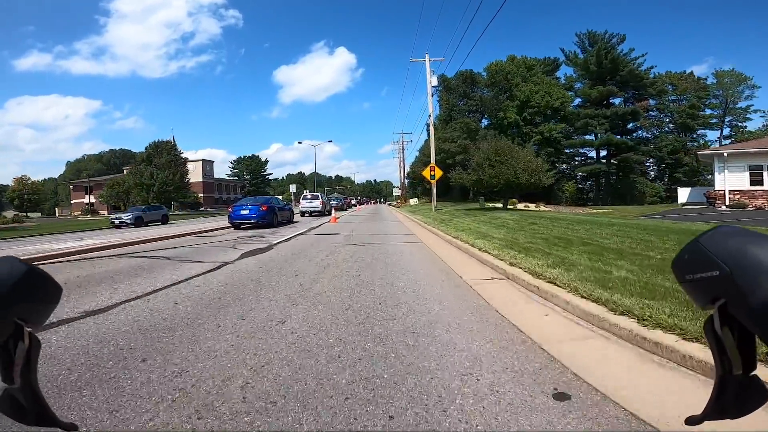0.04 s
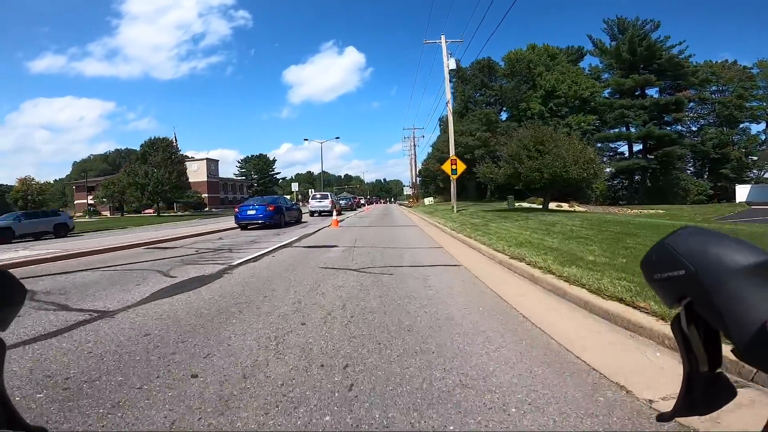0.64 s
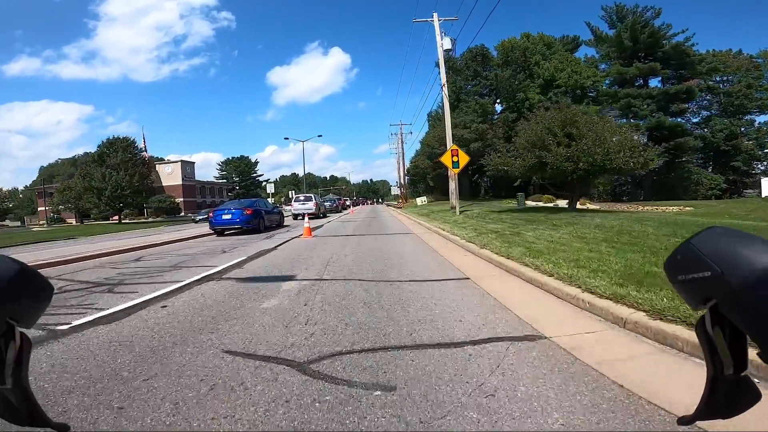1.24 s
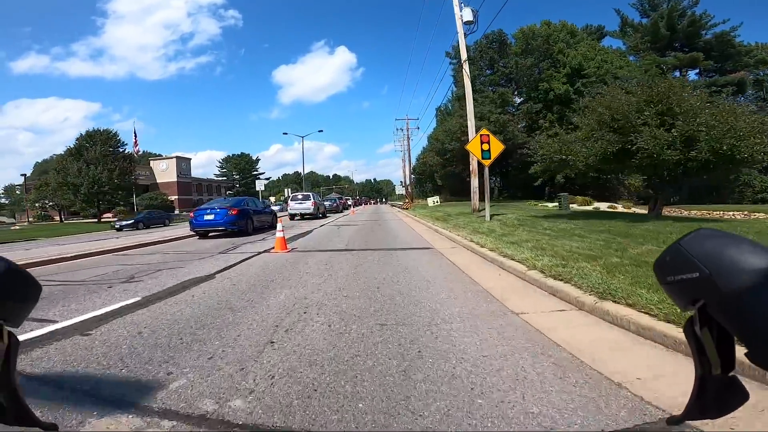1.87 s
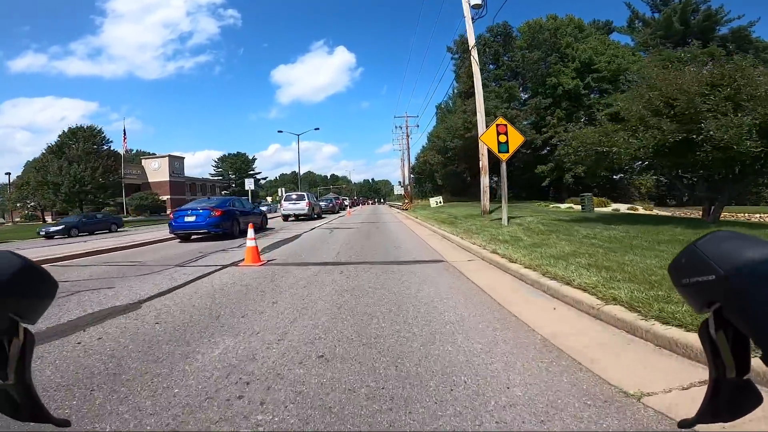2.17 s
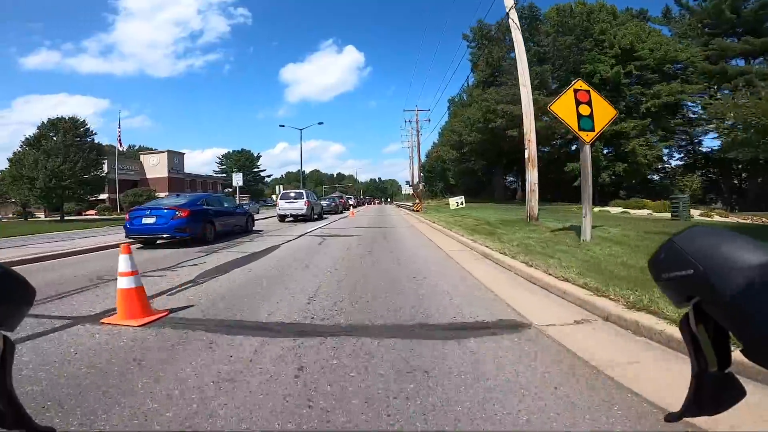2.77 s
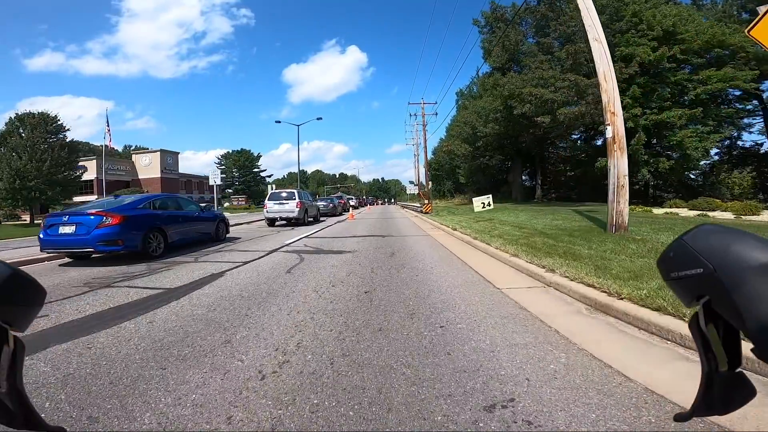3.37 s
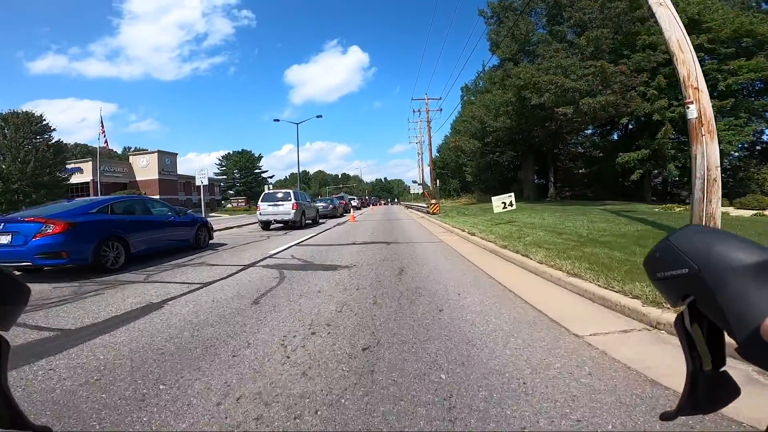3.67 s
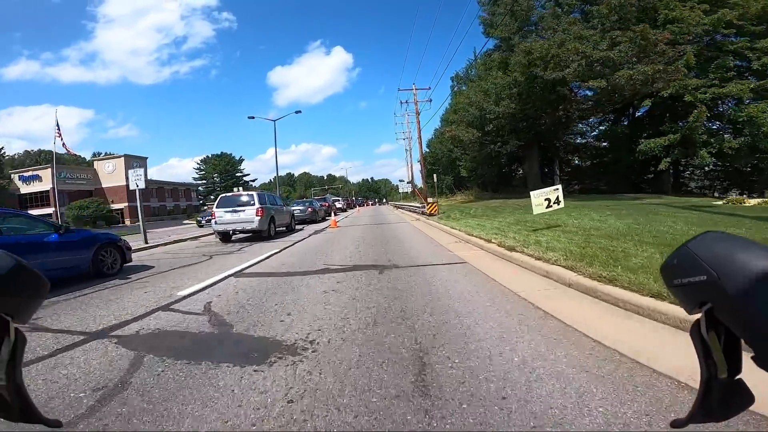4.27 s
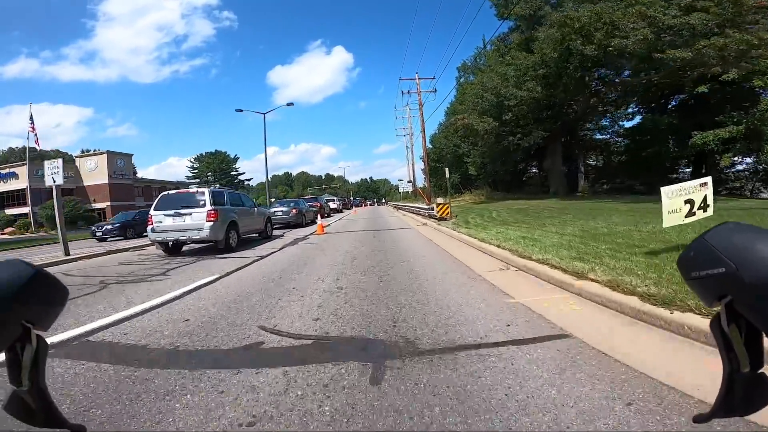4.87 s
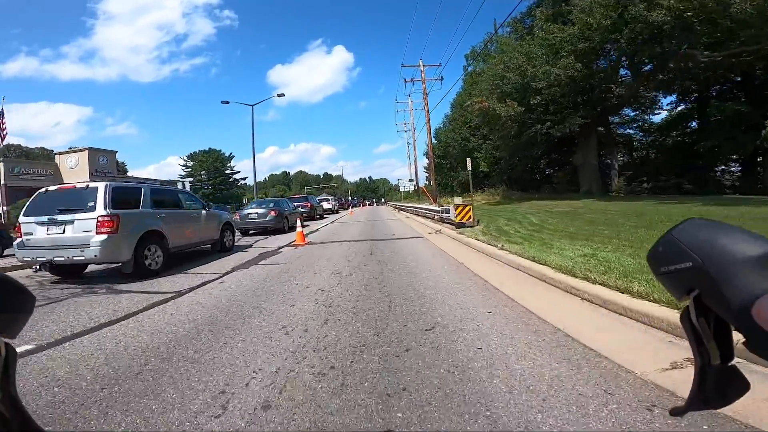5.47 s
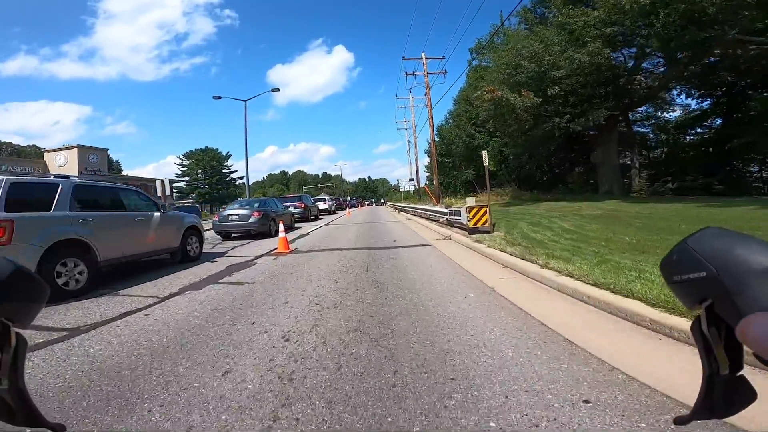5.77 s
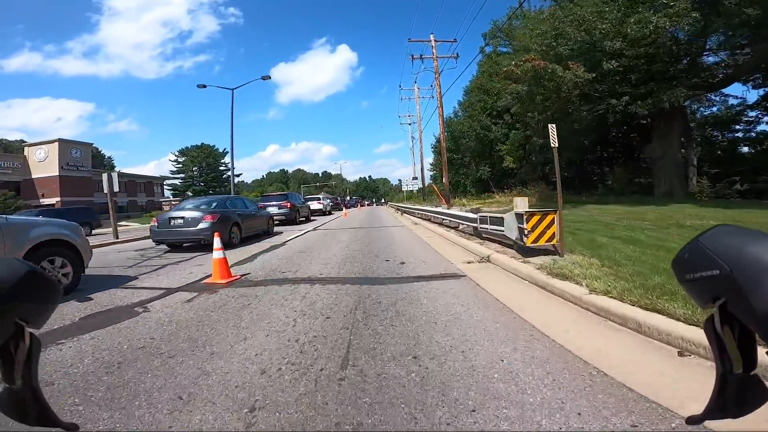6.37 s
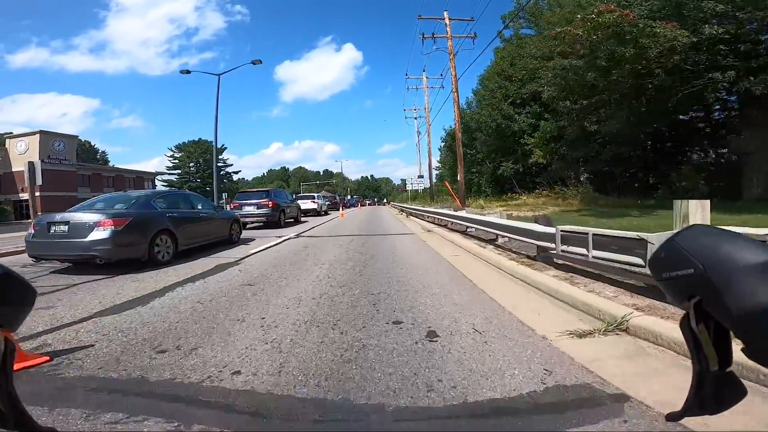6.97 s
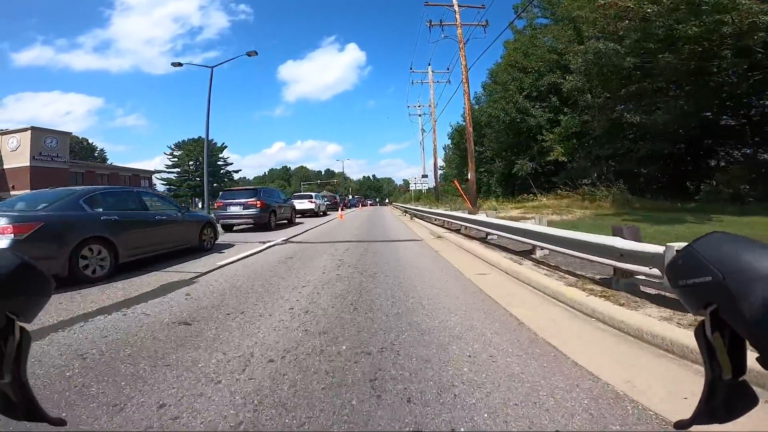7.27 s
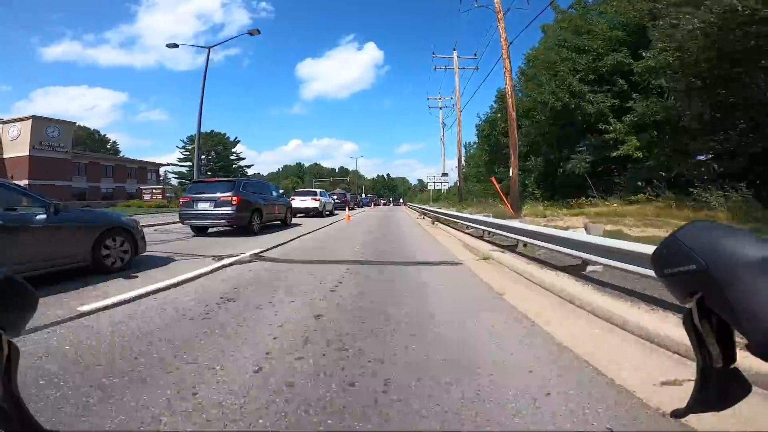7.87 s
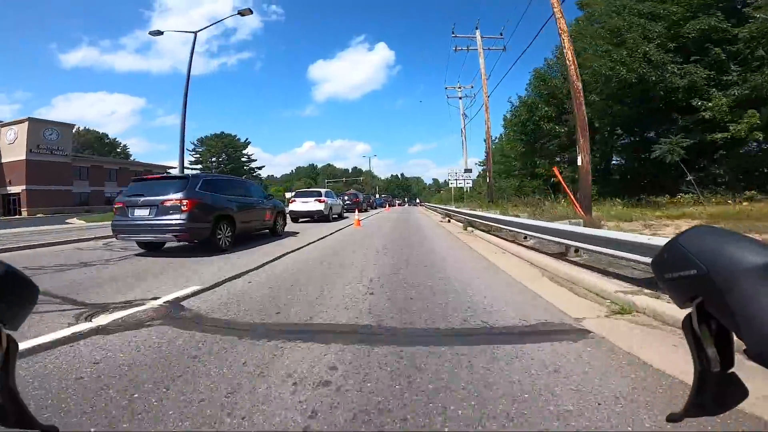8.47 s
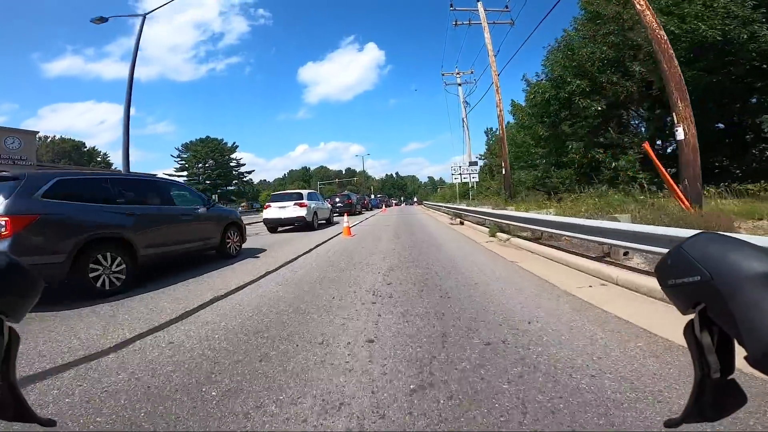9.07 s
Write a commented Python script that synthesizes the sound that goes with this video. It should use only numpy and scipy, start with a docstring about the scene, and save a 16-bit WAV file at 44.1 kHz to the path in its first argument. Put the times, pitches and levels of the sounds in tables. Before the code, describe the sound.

Heard from the handlebar of a moving bicycle, gusty wind rumbles on the microphone while coarse asphalt makes the frame hum and the tyres hiss. Car tyres swell and fade along the street. Grit ticks, a loose part rattles briefly and bumps thud through the mount. One car passes close in the second half, a clack follows, and the wind eases near the end, with very faint insects at the roadside.

```python
"""Coarse asphalt road beside a queue of cars, summer day, heard from the handlebar of a rolling bicycle.
Air buffets the microphone; road grain shakes fork and frame, bumps knock the mount, the treads hiss,
the chain whirrs, grit ticks. Car tyres roar and fade on the far lanes and one car passes close.
Insects shrill more and more from the verge."""
import sys
import numpy as np
from scipy import signal
from scipy.fft import rfft, irfft, next_fast_len
from scipy.io import wavfile
from scipy.ndimage import uniform_filter1d, minimum_filter1d

SR = 44100
rng = np.random.default_rng(int(sys.argv[2]) if len(sys.argv) > 2 else 0)


def to_wav(sig):
    """Store sig (one row per channel, or 1-D mono) as 16-bit WAV at the path in sys.argv[1].

    Samples outside -1..1 are clipped; the rate is SR.
    """
    pcm = np.clip(np.atleast_2d(sig), -1, 1) * 32767
    pcm = np.round(pcm).astype(np.int16)
    wavfile.write(sys.argv[1], SR, pcm.T)  # frames by channels


N = 407043
T = np.arange(N) / SR
LULL_AT_S, LULL_FADE_S = 7.98, 0.74  # head wind slackens
# passing cars: t/s, half length/s, tread note f/Hz, width/Hz, level/dB, rise/dB of roar, rasp, hiss
CARS = [(.5, 0.71, 1004, 115, -43, -0.2, 1, 1.2), (1.92, 0.78, 1736, 282, -57, 1.5, 3.5, 3),
        (3.152, 0.15, 1317, 150, -46, 0.5, 0, 0.5), (3.55, 0.36, 930, 182, -42, -0.7, 1, 1),
        (5.4, 0.26, 1070, 450, -48.5, 1.6, 2.4, 0.8), (6.4, 0.39, 900, 220, -47, 2, 2.5, 3),
        (8.348, 0.21, 802, 109.6, -47, -0.1, 1, 0.9)]


def wind(level_db=-25.5, lull_db=-5, buffet_db=0.63, gust_half_s=0.2):
    """Eddies shed by the housing: even in strength, apart from gusts and a lull."""
    # eddy spectrum: f/Hz, level/dB
    spectrum = [(8, -6.5), (22, -2), (42, -1), (68, -2), (90, -4.5), (130, -9.5), (170, -18.5), (260, -27),
                (500, -38.5), (1200, -59.5)]
    # gusts and slacks: t/s, change/dB
    gusts = [(.72, 2.5), (1.38, -1), (2.02, 4), (2.53, 1.5), (3.4, 2.5), (4.3, 4), (5.25, 4.5), (5.75, 1),
             (7.1, 2.5)]
    gust_db = sum(db * swell(s, gust_half_s) for s, db in gusts)
    db = level_db + gust_db + lull_db * step(LULL_AT_S, LULL_FADE_S) + buffet_db * walk(9)
    return even(colour(noise(), spectrum), span_s=0.14, steadiness=1.0) * undb(db)


def fork(hz=55.1, width_hz=11.5, road_db=-31, lull_db=-10, t60_s=1.2, rise_s=0.078):
    """Road and wind drive the lowest mode of fork and handlebar; each seam adds a jolt."""
    # tar seams: t/s, level/dB
    seams = [(3.0, -21), (3.9, -22), (4.72, -16.5), (5.33, -23), (6.3, -24), (6.62, -19), (7.3, -24.5),
             (8.93, -23)]
    steady = undb(road_db + lull_db * step(LULL_AT_S, LULL_FADE_S))
    jolt_power = sum((undb(db) * decay(s, t60_s)) ** 2 for s, db in seams)
    swing = uniform_filter1d(np.sqrt(steady ** 2 + jolt_power), int(rise_s * SR) + 1)
    return even(narrow(hz, width_hz), span_s=0.1, steadiness=0.65) * swing


def frame(shake_db=-39.5, casing_db=-44, wheel_db=0.9, patchy_db=1.0, wheel_hz=2.85):
    """Asphalt stones drum on the tyre casing and, through it, shake the frame."""
    # frame and handlebar modes: f/Hz, width/Hz, level/dB
    frame_modes = [(96.7, 33, -2.5), (115.5, 29, 2), (139.1, 9.1, 1), (163.2, 14, -7), (204.6, 21.2, -2.5)]
    # casing and rim modes: f/Hz, width/Hz, level/dB
    casing_modes = [(344.3, 11.3, -3), (427, 34, -4.5), (520, 38, -0.2), (829, 69, -2)]
    # coarser or smoother stretches: t/s, half length/s, shaking change/dB, drumming change/dB
    asphalt = [(.7, 0.48, 6, 1.5), (1.4, .2, 1, -2), (2.3, 0.32, 1, 0.5), (3.5, 0.13, 3.5, 3),
               (4.1, 0.35, -8.5, -1), (4.85, 0.28, 0.5, 0.5), (5.75, 0.16, 4, -5), (6.235, .09, 0, 5.5),
               (6.5, 0.78, 1.5, -1.5), (7.523, 0.11, -1.5, -8), (8.4, 0.44, 2.5, 2),
               (8.954, 0.22, -1.5, -4)]
    force = grains(per_s=2500, spread_db=2.0)
    rough_db, drum_db = sum(np.outer(changes, near(s, half_s)) for s, half_s, *changes in asphalt)
    shaking = ring(force * undb(shake_db + rough_db), frame_modes)
    wheel = np.cos(2 * np.pi * wheel_hz * (T - 4.67))  # uneven tyre presses harder once a turn
    drive_db = casing_db + drum_db + wheel_db * wheel + patchy_db * walk(6)
    drumming = ring(force * undb(drive_db), casing_modes)
    return lowpass(shaking, hz=260, order=4) + lowpass(drumming, hz=1100, order=4)


def bumps(thud_hz=121, thud_t60_s=0.3, rise_t60_s=0.04):
    """A bump swings the handlebar and makes the plastic mount clack."""
    # road bumps: t/s, thud/dB, clack/dB
    hits = [(4.19, -28, -48), (6.536, -19, -45), (7.7549, -20.5, -30)]
    # mount modes: f/Hz, level/dB, t60/s
    mount_modes = [(900, -6, .012), (1440, 3, 0.018), (1750, -13, 0.011), (2550, -16, .008)]
    out = 0
    for s, thud_db, clack_db in hits:
        envelope = 2 * (decay(s, thud_t60_s) - decay(s, rise_t60_s))
        swing = envelope * np.sin(2 * np.pi * thud_hz * (T - s))
        out = out + undb(thud_db) * swing + undb(clack_db) * struck(s, mount_modes)
    return lowpass(out, hz=3200)  # rubber clamp softens the blow


def tread(level_db=-59.5, drift_db_per_s=0.3248, crackle_db=-7, flicker_db=0.64, dip_db=-2.0):
    """Air squeezed from under the treads hisses; fine sand crackles in it."""
    # hiss spectrum: f/Hz, level/dB
    spectrum = [(1200, -11), (2600, 4.5), (3500, 3), (4400, 0.5), (4850, -1.5), (5300, -4), (5900, -7),
                (7800, -11), (9000, -11.5), (9700, -18), (10400, -20.5), (11000, -26), (13000, -41)]
    contact = noise() + undb(crackle_db) * grains(per_s=1100, spread_db=3.5)
    _, _, cars_db = car_rises_db()
    db = level_db + drift_db_per_s * T + cars_db + dip_db * dip() + flicker_db * walk(22)
    return colour(contact, spectrum) * undb(db)


def chain(hz=4850, width_hz=190, push_half_s=0.094):
    """The taut chain whirrs on the sprockets at each push."""
    # pedal strokes: t/s, level/dB
    pushes = [(.12, -70), (.55, -72), (1.13, -67), (1.58, -63), (2.05, -69), (2.43, -69), (2.8, -69),
              (3.45, -68), (3.87, -67), (4.25, -69), (4.65, -70), (5.45, -72), (5.95, -69.5), (6.28, -69),
              (6.62, -68), (6.95, -71), (7.35, -69), (7.65, -72), (8.2, -73)]
    return narrow(hz, width_hz) * sum(undb(db) * swell(s, push_half_s) for s, db in pushes)


def grit(t60_s=0.011, ring_db=-7):
    """Flicked stones tick on the frame and leave the metal ringing."""
    # stone hits: t/s, level/dB
    stones = [(2.298, -49.5), (2.3063, -45), (2.328, -53), (2.7673, -52.5), (3.2331, -34.5), (3.2358, -41),
              (3.2424, -49), (3.253, -51.5), (6.1446, -55), (8.6469, -57)]
    # snap of stone on metal: f/Hz, level/dB
    spectrum = [(1800, -1), (3200, 2.5), (5000, 3.5), (6500, 3.2), (7800, 2.5), (9000, 0), (10000, -14),
                (12500, -26)]
    # metal modes: f/Hz, level/dB, t60/s
    metal_modes = [(3360, 7, .05), (5200, -3, .04), (6240, -2, .06), (7050, 4, .05), (8860, -5, .06)]
    blows = sum(undb(db) * decay(s, t60_s) for s, db in stones)
    ticks = even(colour(noise(), spectrum), span_s=0.001, steadiness=.8) * blows
    ringing = signal.fftconvolve(ticks, struck(0, metal_modes))[:N]
    return ticks + undb(ring_db) * np.std(ticks) * unit(ringing)


def rattle(t60_s=0.016):
    """A loose part chatters against the handlebar, dull and dry."""
    # knocks: t/s, level/dB
    knocks = [(5.4305, -43), (5.4452, -36), (5.448, -44), (5.457, -46)]
    # knock spectrum: f/Hz, level/dB
    spectrum = [(800, 2), (1500, 0), (2500, -7), (4500, -11), (5600, -20), (9000, -34)]
    envelope = sum(undb(db) * decay(s, t60_s) for s, db in knocks)
    chatter = even(colour(noise(), spectrum), span_s=0.00091, steadiness=.5)
    return lowpass(chatter * envelope, hz=5000, order=6)


def scuff():
    """The tyre scuffs over loose sand."""
    # sand patches: t/s, half length/s, level/dB
    patches = [(1.58, .08, -55), (5.33, .06, -56), (5.44, 0.047, -54), (6.22, .04, -56), (6.64, 0.079, -53)]
    sand = colour(noise(), [(1600, 9.5), (2800, 11), (4500, -5), (6000, -12), (9000, -25)])
    return sand * sum(undb(db) * swell(s, half_s) for s, half_s, db in patches)


def traffic(roar_db=-35.5, roar_db_per_s=-.5, rasp_db=-48, rasp_db_per_s=-0.3667,
            waver_db=.5, roar_dip_db=-2.0, rasp_dip_db=-1.5):
    """Far car tyres: a slowly receding roar and a brighter rasp, both shifting as cars pass."""
    # roar spectrum: f/Hz, level/dB
    roar_spectrum = [(150, -4.5), (280, -1.5), (450, 0), (640, -2), (800, 2.15), (1020, 0.3), (1180, -2),
                     (1380, -6), (1600, -17), (2400, -35)]
    # rasp spectrum: f/Hz, level/dB
    rasp_spectrum = [(700, -14.5), (1300, 2), (1600, 4.5), (2000, -0.5), (2600, -7), (3400, -14),
                     (5000, -24.5), (9000, -52.5)]
    roar_rise_db, rasp_rise_db, _ = car_rises_db()
    roar = undb(roar_db + roar_db_per_s * T + roar_rise_db + roar_dip_db * dip() + waver_db * walk(11))
    rasp = undb(rasp_db + rasp_db_per_s * T + rasp_rise_db + rasp_dip_db * dip())
    return colour(noise(), roar_spectrum) * roar + colour(noise(), rasp_spectrum) * rasp


def passing_cars():
    """Each car's tread note swells and fades with distance."""
    return sum(narrow(hz, width_hz) * undb(db) * near(s, half_s)
               for s, half_s, hz, width_hz, db, *_ in CARS)


def close_car(at_s=7.03, approach_s=.5, leave_s=.36, comb_hz=600, bounce=0.8, db=-41, tooth_db=-44.5):
    """Direct and road-reflected noise form a comb that sinks as the car nears, then rises."""
    # car spectrum: f/Hz, level/dB
    spectrum = [(380, -12.0), (500, 0.5), (590, 1.5), (850, -3), (1050, -4.5), (1300, -11),
                (2200, -26.5)]
    distance = np.hypot(1, (T - at_s) / np.where(T < at_s, approach_s, leave_s))  # 1 when closest
    tooth_hz = comb_hz * distance
    direct = colour(noise(), spectrum)
    reflected = np.interp(T - 1 / tooth_hz, T, direct)
    lowest_tooth = gliding(tooth_hz, half_width_hz=75) * undb(tooth_db) * near(at_s, half_s=.25)
    return unit(direct + bounce * reflected) * undb(db) / distance + lowest_tooth


def insects(verge_db=-79, thicket_at_s=9.2, thicket_db=4.5, throb_db=1.5, shrill_db=-73, sizzle_db=-75):
    """Insects blend into a shimmering band; a nearing thicket adds a shrill and a higher sizzle."""
    # chorus spectrum: f/Hz, level/dB
    verge_spectrum = [(7000, -36.5), (7950, -11.5), (8250, -4.5), (8520, -1.5), (8850, -9), (9400, -13.5),
                      (12000, -21.5)]
    # sizzle spectrum: f/Hz, level/dB
    sizzle_spectrum = [(8500, -12), (9500, 1), (10300, 0), (11600, -3), (12500, -8)]
    thicket = near(thicket_at_s, half_s=1.2)
    throb = undb(throb_db * walk(30))
    verge = colour(noise(), verge_spectrum) * undb(verge_db + thicket_db * thicket)
    shrill = narrow(hz=8360, width_hz=400) * undb(shrill_db) * thicket
    sizzle = colour(noise(), sizzle_spectrum) * undb(sizzle_db) * near(thicket_at_s, half_s=.33)
    return (verge + shrill) * throb + sizzle


def car_rises_db():
    """Level that passing cars add to roar, rasp and hiss."""
    return sum(np.outer(rises, near(s, half_s)) for s, half_s, _, _, _, *rises in CARS)


def dip(from_s=4.21, to_s=5.17, fade_s=.25):
    """1 while hiss, roar and rasp dip, else 0."""
    return step(from_s, fade_s) - step(to_s, fade_s)


def undb(db):
    """Decibels to gain."""
    return 10 ** (np.asarray(db) / 20)


def unit(x):
    """Scale to rms 1."""
    return x / np.sqrt(np.mean(x ** 2))


def noise():
    """White noise."""
    return rng.standard_normal(N)


def walk(rate_hz):
    """Random levels, held and slewed; rms 1."""
    hold = max(int(SR / rate_hz), 1)
    return unit(uniform_filter1d(noise()[np.arange(N) // hold], hold))


def grains(per_s, spread_db):
    """Random tiny impacts, few of them strong; rms 1."""
    impacts = (rng.random(N) < per_s / SR) * np.sign(noise())
    return unit(impacts * undb(spread_db * np.minimum(rng.exponential(size=N), 6)))


def narrow(hz, width_hz):
    """Steep-skirted noise band; rms 1."""
    mode = [(hz, width_hz, 0)]
    return unit(ring(ring(noise(), mode), mode))


def gliding(hz, half_width_hz):
    """Noise band centred on the curve hz; rms 1."""
    baseband = lowpass(noise() + 1j * noise(), half_width_hz)
    return unit(np.real(baseband * np.exp(2j * np.pi * np.cumsum(hz) / SR)))


def colour(x, points):
    """Shape x by (f/Hz, level/dB) points, rolling off past both ends; rms 1."""
    hz, db = np.transpose(points)
    n = next_fast_len(N, real=True)
    f = np.maximum(np.arange(n // 2 + 1) * SR / n, 1)
    rolloff = np.minimum(f / hz[0], 1) ** 2 * np.minimum(hz[-1] / f, 1) ** 2
    gain = undb(np.interp(np.log(f), np.log(hz), db))
    return unit(irfft(rfft(x, n) * rolloff * gain, n)[:N])


def ring(x, modes):
    """Drive (f/Hz, width/Hz, level/dB under unit noise) modes of alternating sign."""
    out = 0
    for k, (hz, width_hz, db) in enumerate(modes):
        b, a = signal.iirpeak(hz, hz / width_hz, fs=SR)
        out = out + (-1) ** k * undb(db) * np.sqrt(SR / np.pi / width_hz) * signal.lfilter(b, a, x)
    return out


def struck(at_s, modes):
    """Ringing of (f/Hz, level/dB, t60/s) modes after a blow."""
    return sum(undb(db) * decay(at_s, t60_s) * np.sin(2 * np.pi * hz * (T - at_s))
               for hz, db, t60_s in modes)


def lowpass(x, hz, order=2):
    """Smooth low-pass."""
    return signal.sosfilt(signal.butter(order, hz, fs=SR, output="sos"), x)


def even(x, span_s, steadiness):
    """Level out the random swells of x; rms 1."""
    strength = np.sqrt(uniform_filter1d(x ** 2, int(span_s * SR) + 1) + 1e-9)
    return unit(x / strength ** np.clip(steadiness, 0, 1))


def decay(at_s, t60_s):
    """Jump to 1, then die away."""
    return (T >= at_s) * np.exp(-np.log(1000) * np.clip((T - at_s) / t60_s, 0, 10))


def near(at_s, half_s):
    """Closeness in passing: 1 at at_s, 0.5 at half_s either side."""
    return 1 / (1 + ((T - at_s) / half_s) ** 2)


def swell(at_s, half_s):
    """Bell-shaped rise and fall."""
    return np.exp(-((T - at_s) / half_s) ** 2)


def step(at_s, fade_s):
    """Smooth change from 0 to 1."""
    return .5 + .5 * np.tanh(2 * (T - at_s) / fade_s)


def scene():
    """Mono sum at the handlebar."""
    bicycle = fork() + frame() + tread() + chain() + grit() + rattle() + scuff() + bumps()
    street = traffic() + passing_cars() + close_car() + insects()
    return (wind() + bicycle + street)[None]


def record(dry, ceiling_db=-13.8, hold_s=0.02, split_hz=400, top_hz=12600):
    """A look-ahead bass limiter holds down the strongest buffets; the top is cut."""
    bass = signal.sosfiltfilt(signal.butter(4, split_hz, fs=SR, output="sos"), dry)
    hold = int(hold_s * SR) + 1
    allowed = np.minimum(1, undb(ceiling_db) / (np.abs(bass) + 1e-9))
    gain = uniform_filter1d(minimum_filter1d(allowed, hold), hold)
    limited = dry + bass * (gain - 1)
    return signal.sosfilt(signal.ellip(8, .2, 70, top_hz, fs=SR, output="sos"), limited)


dry = scene()
out = record(dry)
to_wav(out)
```